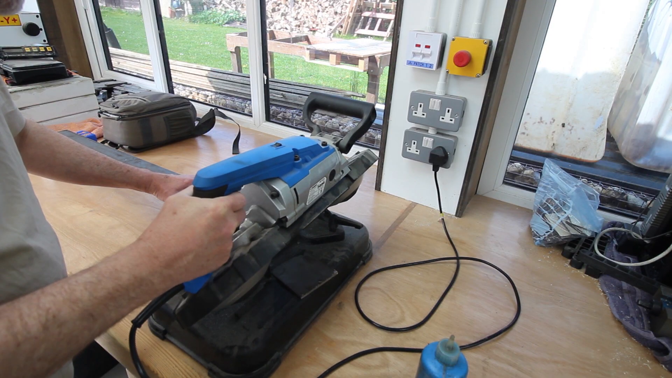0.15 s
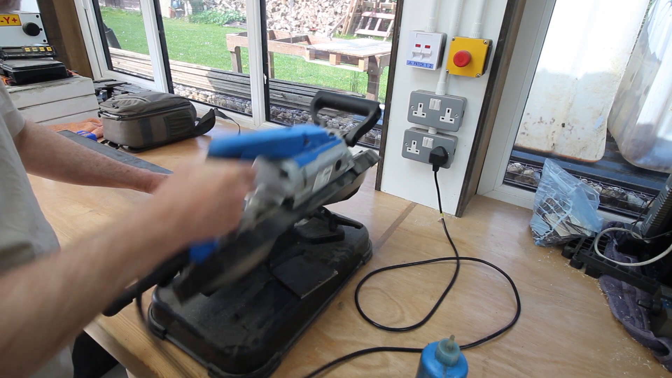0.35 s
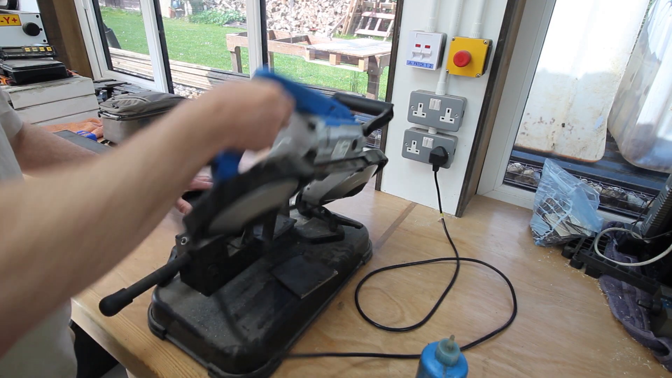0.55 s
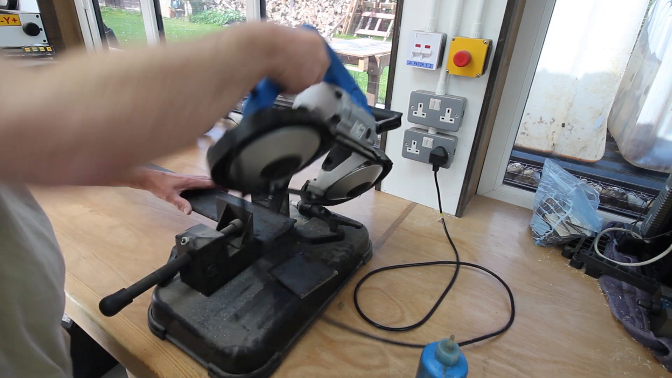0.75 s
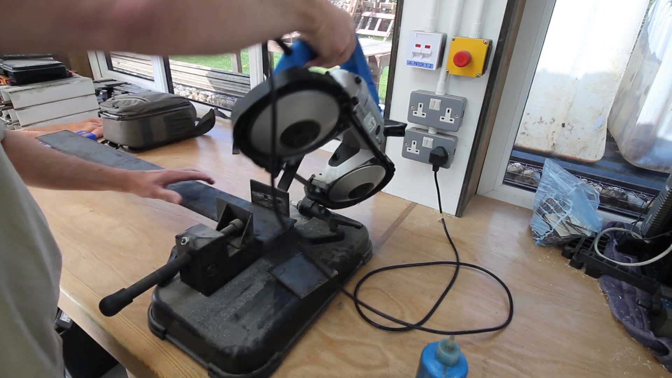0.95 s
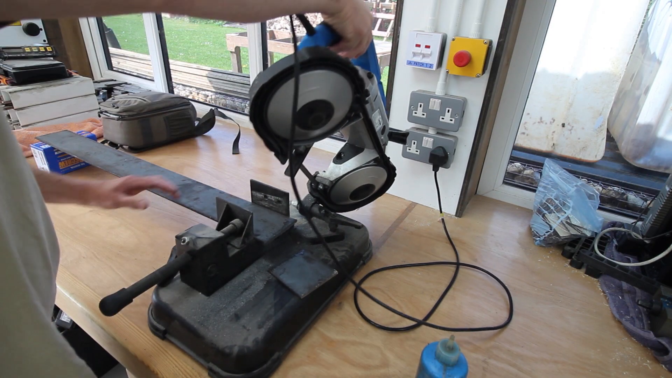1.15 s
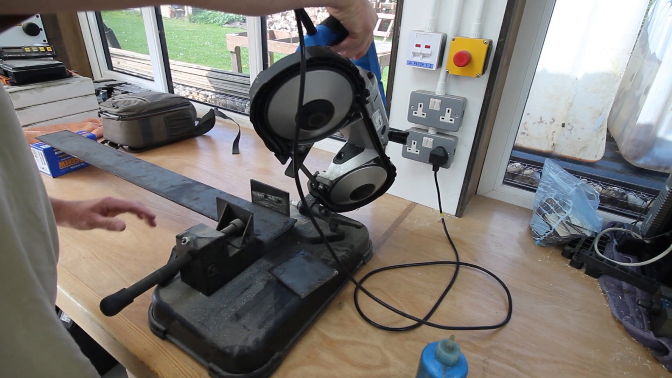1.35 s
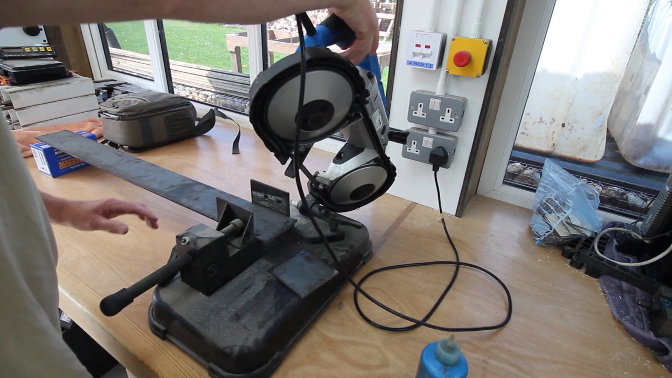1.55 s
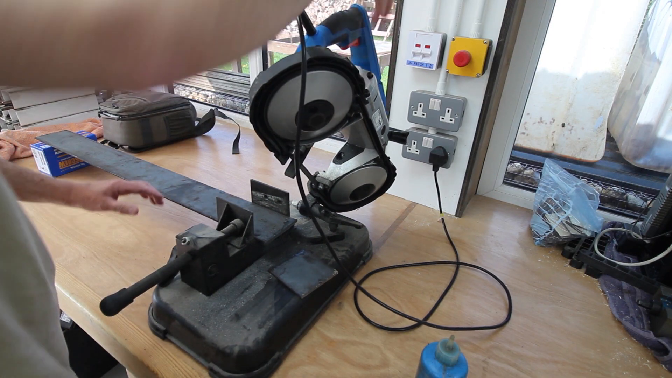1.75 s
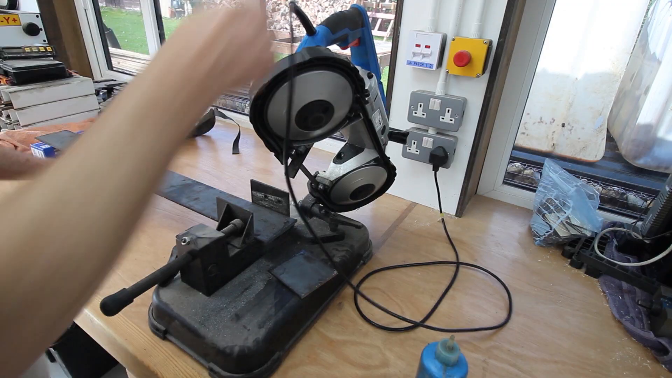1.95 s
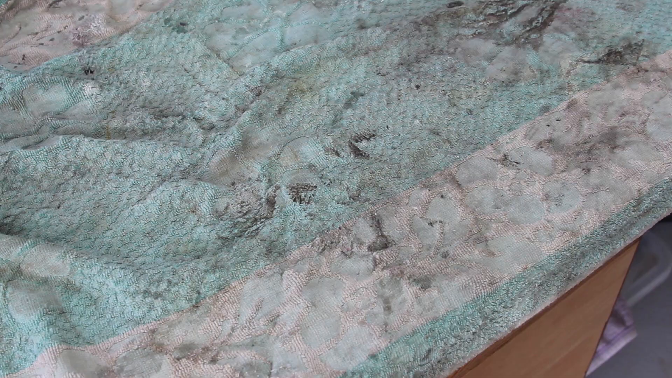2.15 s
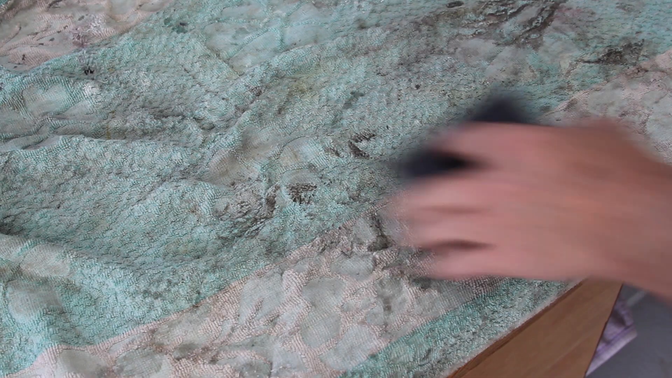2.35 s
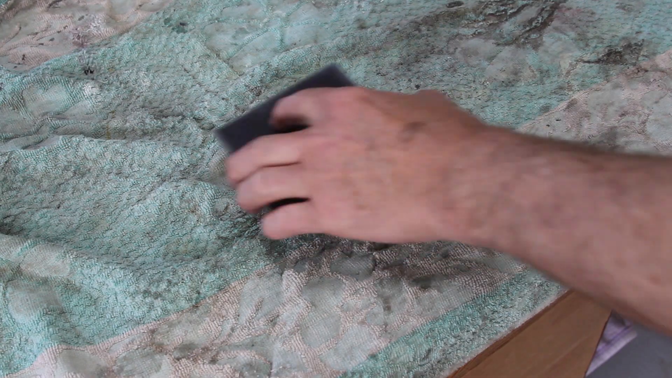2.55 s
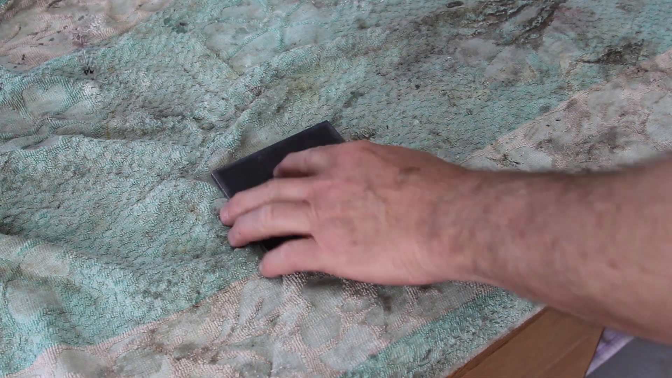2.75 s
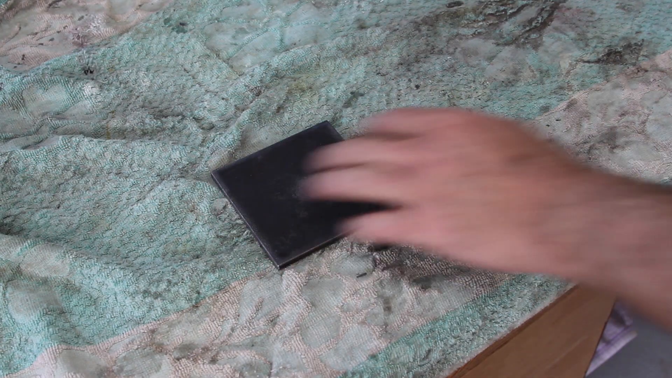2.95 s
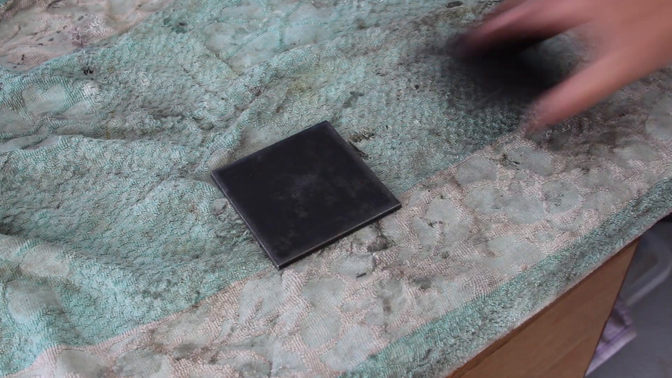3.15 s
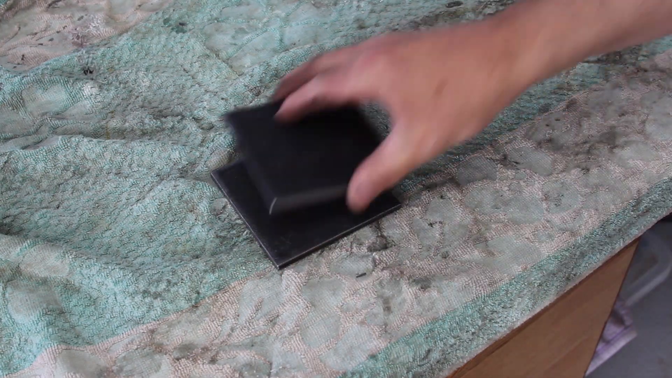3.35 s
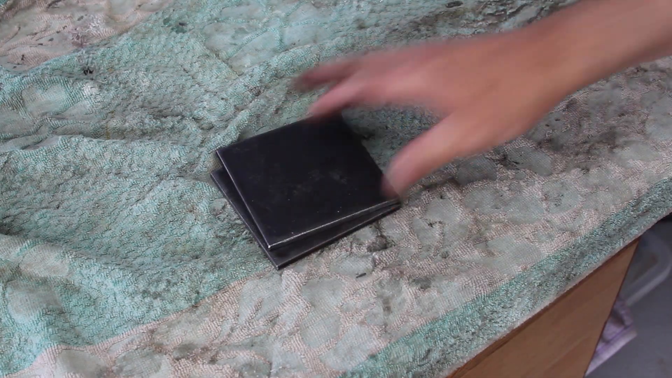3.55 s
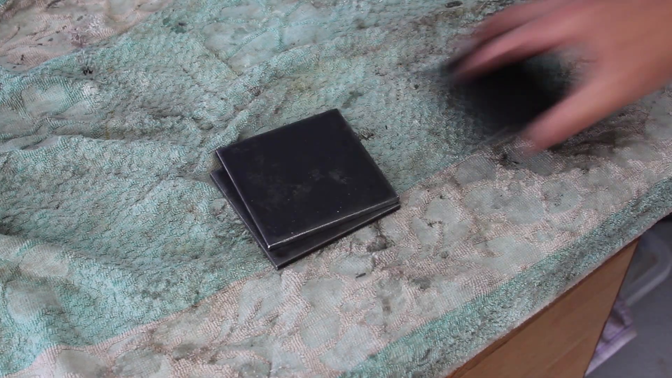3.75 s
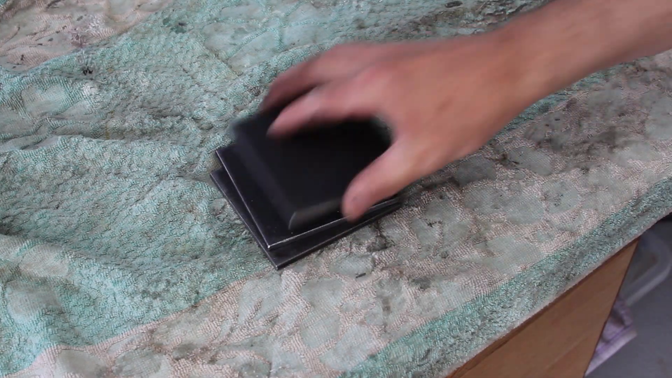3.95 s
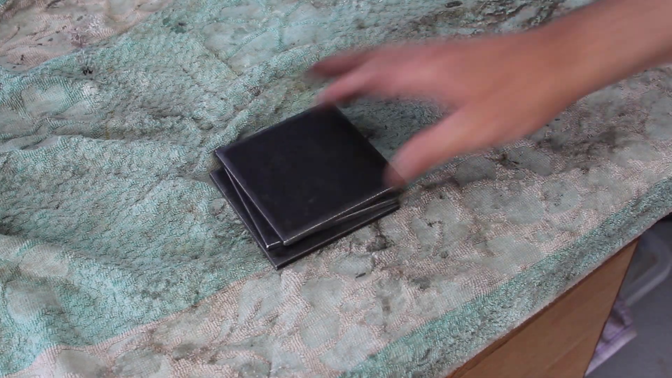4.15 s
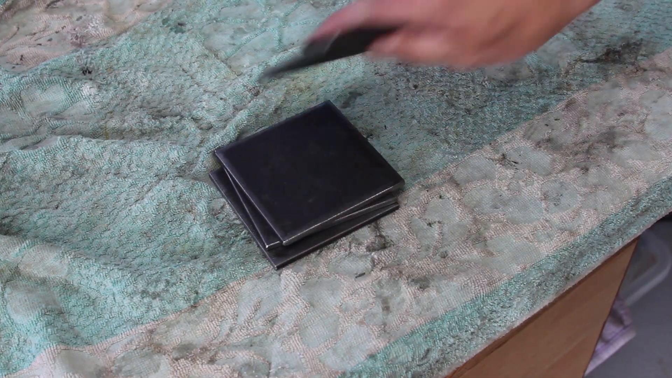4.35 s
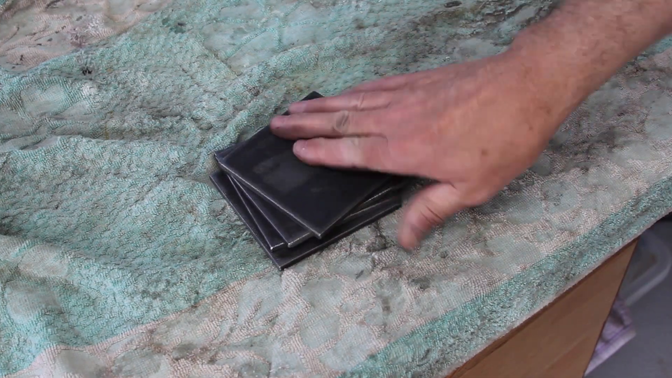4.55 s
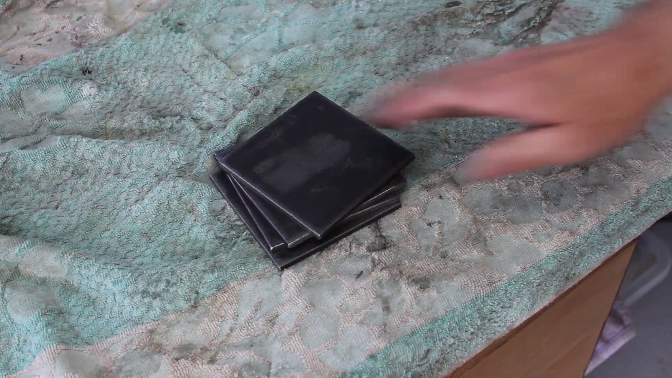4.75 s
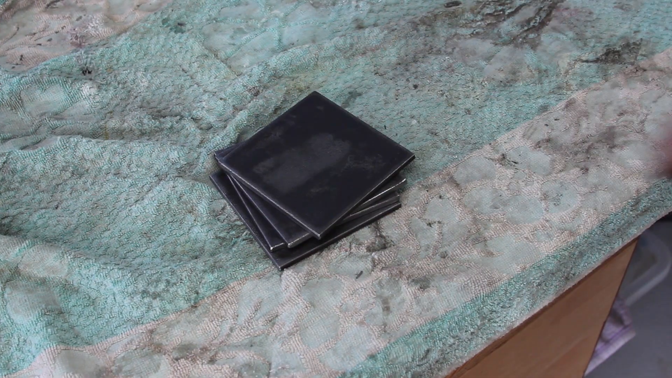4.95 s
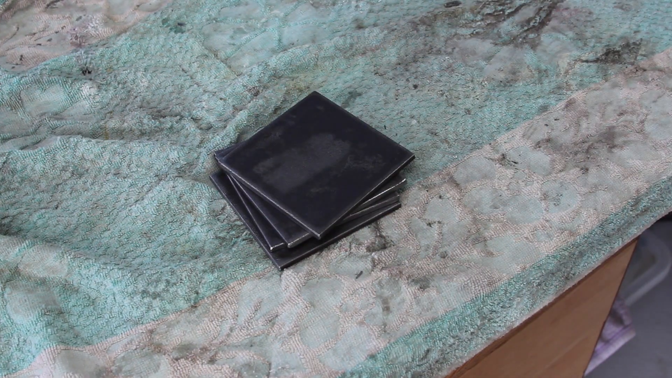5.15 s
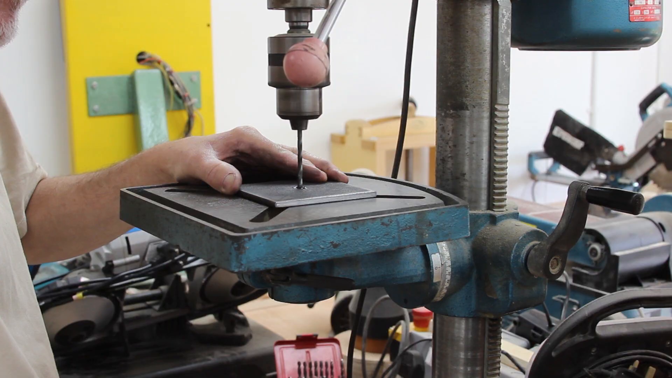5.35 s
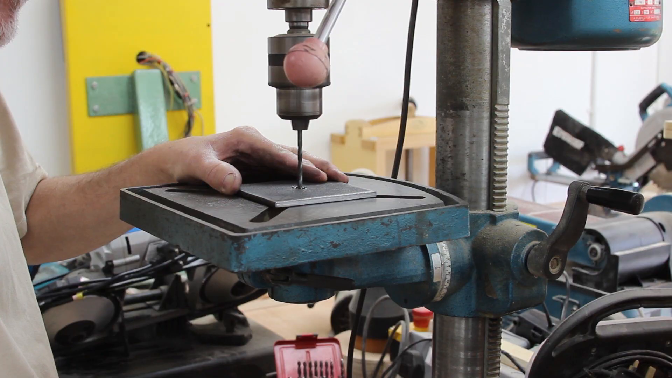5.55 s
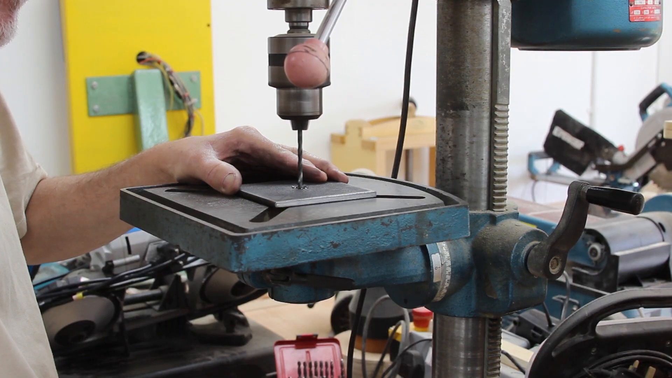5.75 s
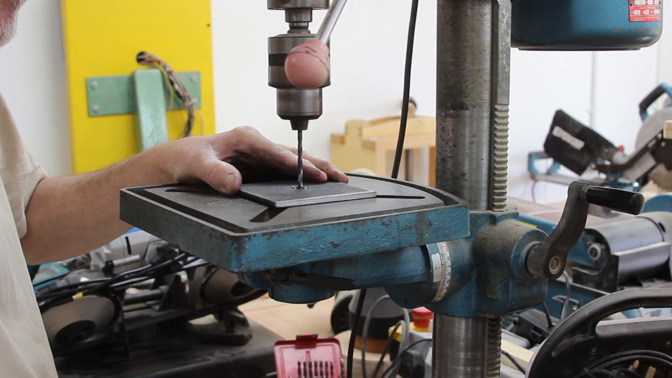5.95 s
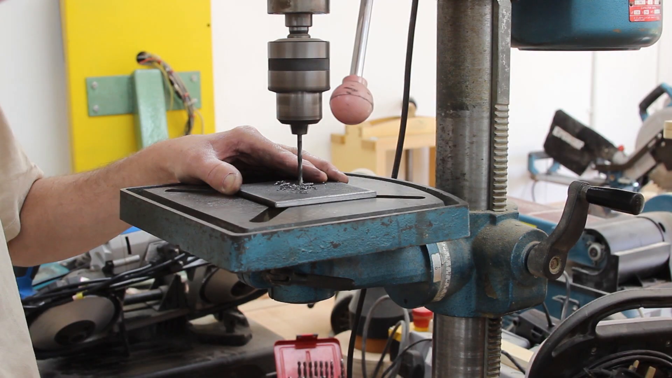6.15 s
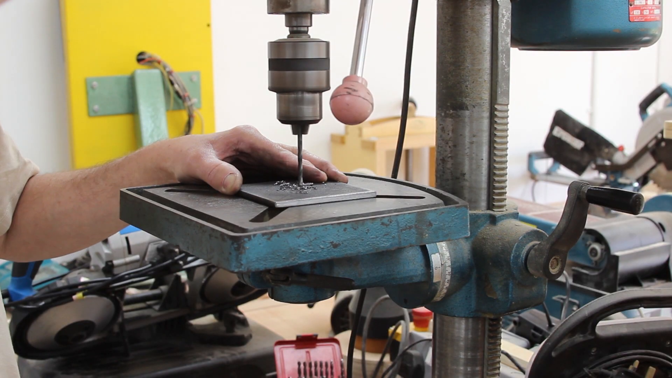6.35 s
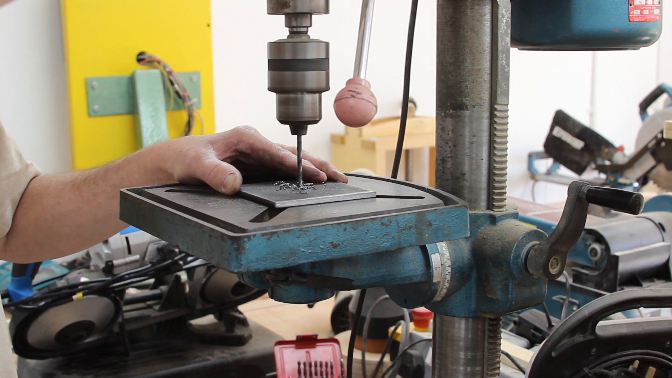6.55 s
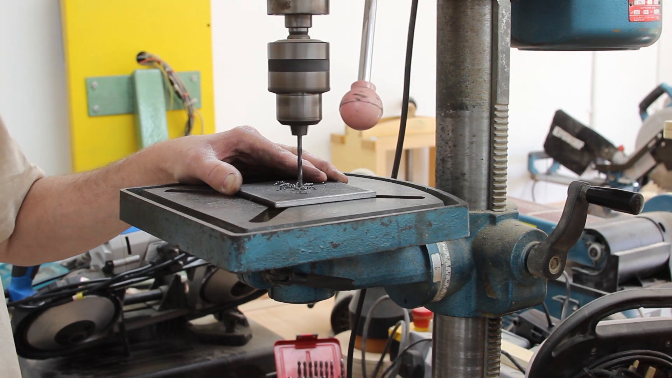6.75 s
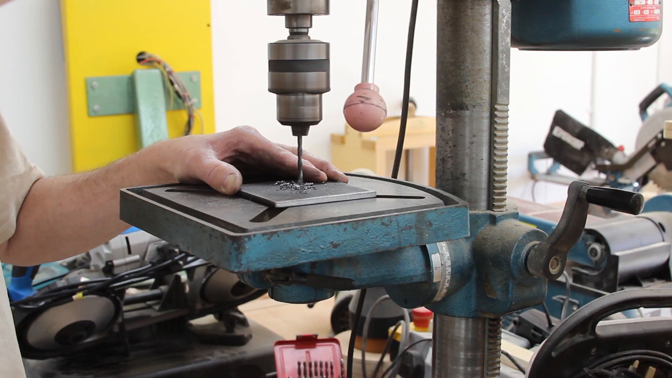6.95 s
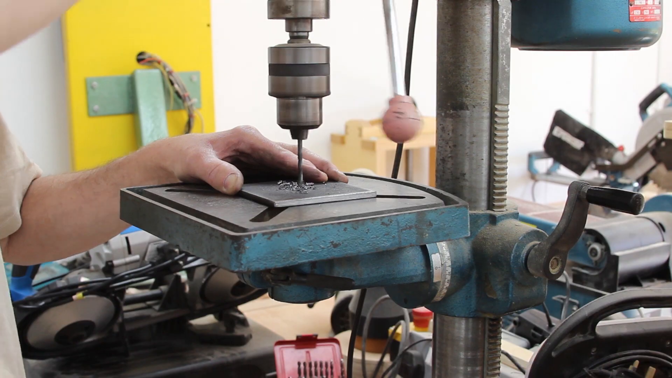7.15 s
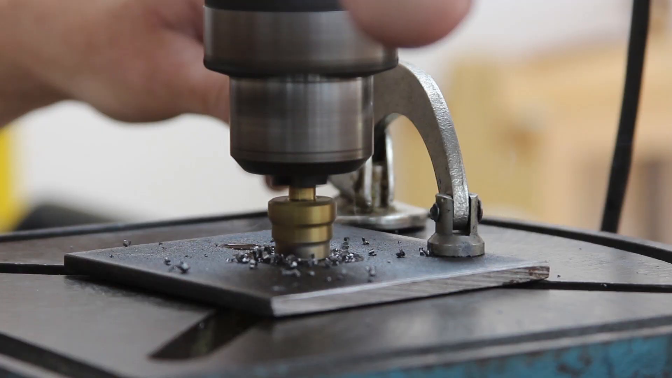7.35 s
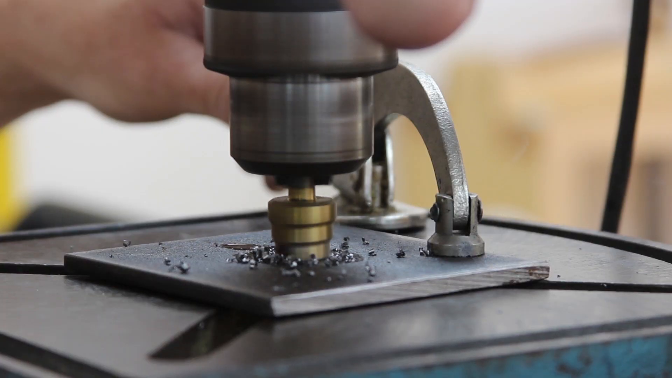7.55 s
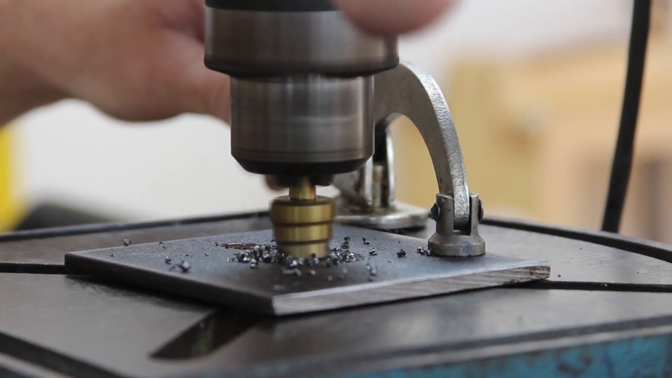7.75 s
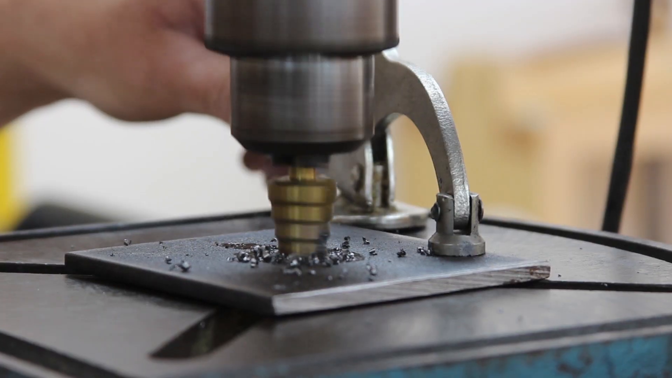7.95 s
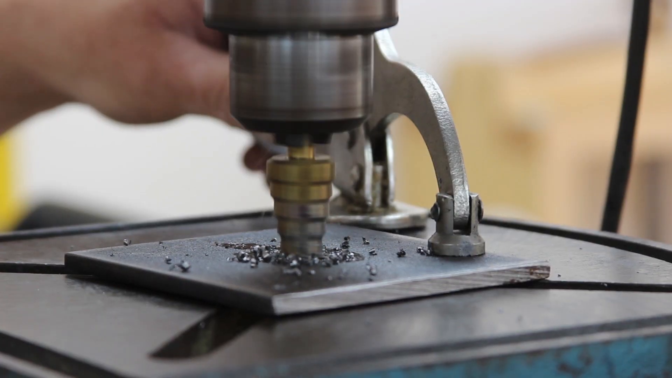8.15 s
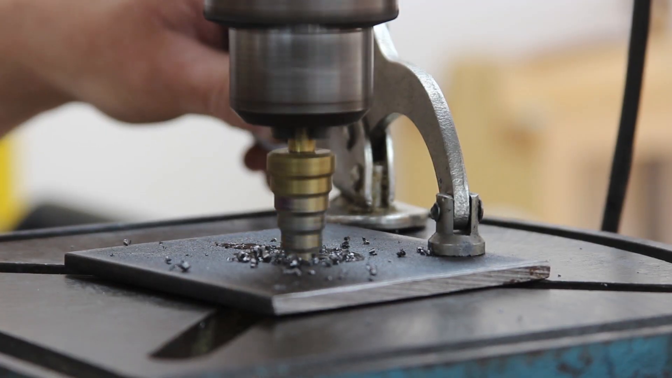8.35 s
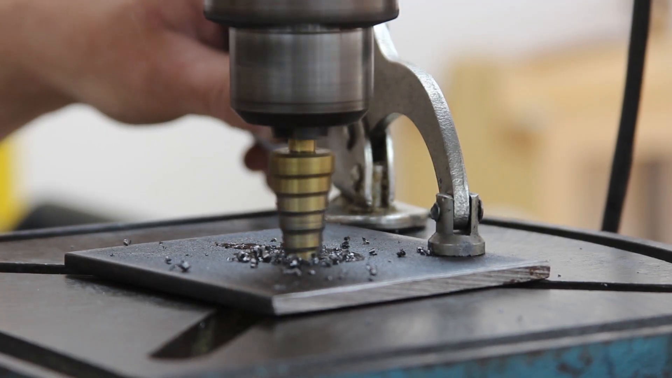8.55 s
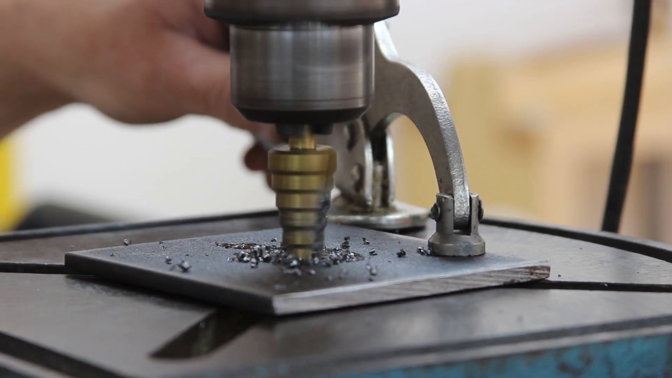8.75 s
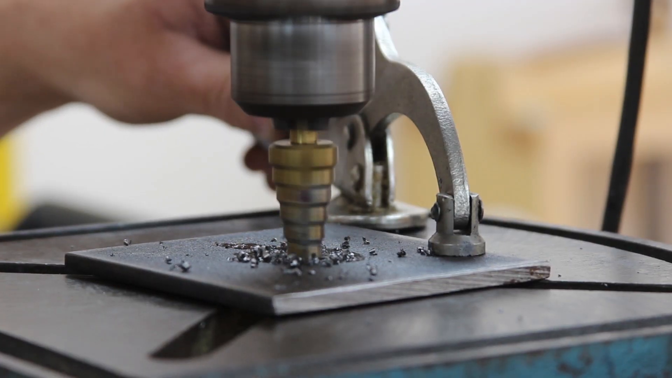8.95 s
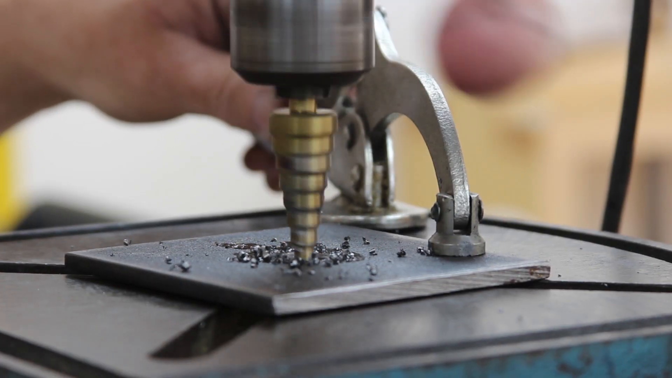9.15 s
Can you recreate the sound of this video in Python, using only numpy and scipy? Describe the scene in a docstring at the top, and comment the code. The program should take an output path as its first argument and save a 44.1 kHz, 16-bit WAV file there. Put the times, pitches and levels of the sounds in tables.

```python
"""A portable band saw is switched off and coasts down: shaft tones and noise excite the resonances of its housing.
Four steel plates are then stacked on a cloth-covered bench: each blow sums decaying modes, a crack and a thud.
A drill press bores a plate: hum, rumble and cutting noise, the middle passage played four times too fast.
A quiet room with a faint whine lies under the plates. A gain control ducks loud blows and the fast drilling."""
import sys
import numpy as np
from scipy import signal
from scipy.fft import rfft, irfft, next_fast_len
from scipy.io import wavfile
from scipy.ndimage import uniform_filter1d, minimum_filter1d, map_coordinates

SR = 44100
rng = np.random.default_rng(int(sys.argv[2]) if len(sys.argv) > 2 else 0)


def inscribe(sig):
    """Save sig as 16-bit PCM at rate SR to the path in sys.argv[1].

    A 1-D sig is mono; a 2-D sig holds one channel per row.
    Samples are clipped to [-1, 1] before scaling.
    """
    pcm = np.round(np.clip(np.atleast_2d(sig).T, -1, 1) * 32767)
    wavfile.write(sys.argv[1], SR, pcm.astype(np.int16))


N = 409248
T = np.arange(N) / SR  # time of each sample (s)
TOP_HZ = 16200  # upper band limit

# Passages
SAW_END_S, DRILL_START_S, FAST_START_S, FAST_END_S = 2.195, 5.272, 6.12, 7.393
# Edges of the plate passages: time_s
PLATE_EDGES = [2.195, 3.07, 3.634, 4.274, 5.271]

# Saw run-down
FULL_TURNS_PER_S, SWITCH_OFF_S = 353, 0.1055
FRICTION_TURNS_PER_S2 = 78.1
FAN_EVEN_TURNS_PER_S = 278.6  # at this speed fan drag equals friction
SKIP_AT_S, SKIPPED_S = 1.0, 0.3095  # the run-down jumps ahead
FADE_IN_S, FADE_IN_DB = 0.15, -3
# Shaft multiples of wheel and rotor imbalance: order
ROTOR_ORDERS = [.37, 1, 2]
# Shaft multiples of the gear mesh: order
GEAR_ORDERS = [11.65, 23.3, 34.9, 46.6, 58.2]
# Shaft multiples of pinion teeth, slots and commutator bars: order
ARMATURE_ORDERS = [7, 14, 21, 28]
# Shaft multiples of the commutator bar overtones: order
BAR_OVERTONES = [42, 56]
# Strength of each tone within its family, before the housing: relative_db
ROTOR_DB = [-4, 0.5, -10]
GEAR_DB = [1.5, -5, -6.5, -6, -10]
ARMATURE_DB = [-2.5, -6.5, -15, 2.5]
OVERTONE_DB = [-2.5, -1]
# Speed law of each family or noise: full_speed_db, rise_db (per halving of speed)
ROTOR_LEVEL = (-41, -6.5)
GEAR_LEVEL = (-41.5, -2.4)
ARMATURE_LEVEL = (-41.5, 1.2)
OVERTONE_LEVEL = (-49, 4)
WHIRR_LEVEL = (-28.5, -.8)
GROWL_LEVEL = (-42.5, 2.4)
# Noise of brushes and fan, before the housing: frequency_hz, density_db (relative, per Hz)
WHIRR_SPECTRUM = [(710, -30), (1200, -0.5), (1530, -8.5), (1720, -2.5), (2580, -1.5), (3220, 0.5),
                  (3820, -2), (5660, 0.5), (7300, -3.5), (10200, -15.5), (15200, -20), (15400, -72.5)]
# Noise of gearbox and wheels, before the housing: frequency_hz, density_db (relative, per Hz)
GROWL_SPECTRUM = [(15, -58), (25, -52), (214, -3.5), (261, 2.5), (373, -5), (594, 1), (912, -2), (1190, -3),
                  (1530, -13), (1800, -43), (2340, -37.5), (3960, -120)]
# Housing resonances: centre_hz, width_hz, boost_db (for noise; tones get 1.2 times as many dB)
HOUSING = [(280, 68, 5), (668, 240, 8), (1208, 57, 4), (3260, 300, 3), (4050, 130, 3.5), (4580, 330, 5),
           (5150, 130, 3.5), (5696, 51, 9.5), (7220, 430, 3)]
# How well the frame radiates a tone: frequency_hz, gain_db
RADIATION = [(60, -34), (130, -12), (300, -5.5), (800, -5.5), (1800, -8), (3500, 2), (7000, -3),
             (10000, -2), (15000, -21)]
# Low rumble while the saw is raised: start_s, end_s, centre_hz, level_db
SHUDDER = (1.5, 1.7, 70, -67)

# Plate contacts: time_s, ring_db, crack_db, thud_db, damping (1 = free, more = pressed), treble_corner_hz
CONTACTS = [(2.7436, -33, -38, -6, 1.9, 3570), (2.758, -36, -42, -6, 1.4, 3440),
            (3.482, -2.5, -5.5, -25.5, 2.3, 16000), (3.488, -11.5, -9, -25, 0.97, 16000),
            (4.0661, -3.5, 1, -33, 2.8, 16000), (4.413, -66, -58.5, -90, 3, 9000),
            (4.526, -17, -6, -24, 0.51, 16000), (4.543, -15, -14, -40.5, 1.9, 12000),
            (4.5589, -22, -4, -39, 2.8, 16000), (4.561, -0.5, -1.5, -27.5, 2.35, 12960),
            (4.629, -36.5, -34, -53.5, 2, 6000), (5.234, -68, -51, -80.5, 3, 5020)]
# Modes of a plate: mode_hz
PLATE_HZ = [1800, 1970, 2310, 2640, 2950, 3265, 3450, 4585, 4760, 5290, 6200, 8060, 8240, 8970, 10030,
            13420, 14980]
# The same modes: relative_db, t60_s (at damping 1)
PLATE_MODES = [(-8, 0.1), (-14, 0.16), (-15, 0.12), (-13.5, 0.095), (-5, 0.048), (3.5, 0.12), (-13, .07),
               (-3, 0.15), (-15, 0.038), (-19, 0.062), (-17.5, .07), (-7, 0.13), (-8.5, 0.1), (-12.5, 0.15),
               (-12.5, 0.077), (-6.5, 0.12), (-14, .05)]
# Crack of steel on steel: frequency_hz, density_db (relative, per Hz)
CRACK_SPECTRUM = [(200, -25), (1000, -7), (2000, 2.5), (5000, 8.5), (9000, -10), (16000, -14.5)]
# Resonances of the bench: centre_hz
BENCH_HZ = [150, 200, 275, 420, 640, 1080, 2000]
# The same resonances: width_hz, relative_db
BENCH_MODES = [(40, -2.5), (50, -0.5), (60, 2), (160, -2.5), (240, -0.5), (500, -9), (700, -21)]

# Drill levels: light boring, the fast passage, a hard bite that eases off, then one late rasp;
# the fast passage is then ducked by a gain control:
# time_s, motor_db, cutting_db, hum_db, lowest_tone_db (over the hum)
DRILL = [(5.27, -43, -49.5, -39.5, -7), (6.11, -42, -49.5, -40, -6), (6.125, -41.5, -53, -42, -2.5),
         (6.9, -41.5, -48.5, -41, -4.5), (7.385, -40.5, -49, -42.5, -1.5),
         (7.396, -37.5, -37.5, -36.5, -3.5), (7.82, -40.5, -40.5, -42.5, 0), (7.97, -44.5, -45.5, -41, 0),
         (8.07, -44, -56, -44, 2.5), (8.6, -43, -53, -44.5, 6), (9.07, -41, -53.5, -43, 4.5),
         (9.12, -43.5, -44, -48, 11), (9.28, -41, -49.5, -44.5, 6)]
# Hum of an induction motor on 50 Hz mains, at natural speed: pitch_hz
HUM_HZ = [100, 200, 300, 495, 665]
# The same hum tones: relative_db
HUM_DB = [-10.5, -19.5, 0.5, -12, -20]
# The pulley throbs once a turn, at natural speed
MOTOR_TURNS_PER_S, THROB_DB = 24.4, 0.5
# Motor and belt noise, before the castings: frequency_hz, density_db (relative, per Hz)
RUMBLE_SPECTRUM = [(20, -67), (45, -12), (100, -12), (250, -6.5), (400, -11), (1000, -5), (1500, -7),
                   (2100, -17.5), (3200, -15.5), (5000, -42), (8000, -36.5), (13600, -39.5), (13900, -90)]
# Drill head and table resonances: centre_hz, width_hz, boost_db
CASTING = [(328, 114, 17.5), (503, 26, 10.5), (663, 12, 10.5), (788, 9.3, 9.5), (1063, 110, 10),
           (1454, 4.6, 13), (1800, 16, 11), (2480, 22, 11.5), (2740, 67, 14), (3300, 100, 1), (4220, 45, 8)]
# Noise of the cutting edge, before the plate: frequency_hz, density_db (relative, per Hz)
CUTTING_SPECTRUM = [(150, -19), (300, 1), (700, -5), (1700, -2.5), (2600, -4), (4000, -7), (6000, -12.5),
                    (9000, -25.5), (13800, -39), (14400, -80)]
# Resonances of the clamped plate: centre_hz, width_hz, boost_db
WORKPIECE = [(329, 140, 15.5), (547, 32, 16.5), (1680, 280, 5.5), (2450, 360, 5), (4050, 350, 5),
             (5620, 400, 1.5)]
# An edge of the bit catches as the spindle turns: start_s, catch_s (time of one), catches_per_s, swell_db
CATCHES = [(5.272, 5.425, 11.3, 3), (6.12, 6.13, 22.6, 1), (7.393, 7.41, 5.2, 5), (8.05, 8.466, 5.75, 3)]
CATCH_SHARPNESS = 1.7
# Squeaks of the bit: start_s, end_s, pitch_hz, level_db
SQUEAKS = [(7.79, 7.96, 1720, -49), (5.28, 6.11, 4170, -65), (5.58, 5.8, 7700, -71), (5.6, 5.74, 7050, -72)]
# Swarf snaps off or lands; the fast passage is then ducked by a gain control: time_s, peak_db, centre_hz
CHIPS = [(6.132, -42, 6000), (7.057, -26, 4600), (7.0935, -21.5, 8500), (7.096, -21, 13100),
         (7.095, -22, 2980), (7.15, -36, 5000), (7.184, -29, 4280), (7.84, -53, 11500), (8.34, -56, 11000),
         (8.42, -54, 11000), (8.465, -43.5, 11000), (8.64, -53, 6000), (8.984, -32, 1060),
         (9.157, -54, 6000), (9.216, -42.5, 8100)]

# Reverberation of the workshop: frequency_hz, t60_s
ROOM = [(150, 0.76), (530, 0.46), (1400, .45), (3700, 0.54), (9700, 0.33)]
# Room tone: frequency_hz, density_db (relative, per Hz)
QUIET_SPECTRUM = [(18, -28.5), (30, 0.5), (54, -21.5), (119, -7.5), (199, -13.5), (245, -8.0), (527, -13.0),
                  (584, -5.0), (647, -14.0), (1170, -12), (13600, -25), (14100, -71.5)]
QUIET_DB = -65.5
# Faint whine in the room: pitch_hz, level_db
WHINE = [(586.8, -74.5), (1174, -85)]


def saw():
    """Forced vibration: a shaft tone swells when its falling pitch crosses a housing resonance."""
    n = round(SAW_END_S * SR)
    speed = coasting()[:n]
    turns = np.cumsum(speed * (1 + 0.00096 * wobble(59.8, count=n))) / SR

    def level(full_speed_db, rise_db):
        return amp(full_speed_db + rise_db * np.log2(FULL_TURNS_PER_S / speed))

    families = [(ROTOR_LEVEL, ROTOR_ORDERS, ROTOR_DB), (GEAR_LEVEL, GEAR_ORDERS, GEAR_DB),
                (ARMATURE_LEVEL, ARMATURE_ORDERS, ARMATURE_DB), (OVERTONE_LEVEL, BAR_OVERTONES, OVERTONE_DB)]
    tones = np.zeros(n)
    for law, orders, strengths_db in families:
        family = sum(shaft_tone(turns, speed, order, db) for order, db in zip(orders, strengths_db))
        tones += level(*law) * family
    tones = filtered(tones, lambda hz: boosts(HOUSING, hz) ** 1.2 * amp(along(RADIATION, hz)))

    whirr = rush(WHIRR_SPECTRUM, HOUSING, lumps_db=1.0, rate=400, patchy_db=1.4)[:n]
    whirr *= level(*WHIRR_LEVEL) * amp(0.41 * wobble(10.8, count=n))
    growl = rush(GROWL_SPECTRUM, HOUSING, lumps_db=-1.0, rate=37, patchy_db=1.7)[:n]
    growl *= level(*GROWL_LEVEL) * amp(1.04 * wobble(15, count=n))
    fade_in = amp(FADE_IN_DB * np.clip(1 - T[:n] / FADE_IN_S, 0, 1))
    return np.pad((tones + whirr + growl) * fade_in, (0, N - n))


def coasting():
    """Braked rotation: steady friction plus fan drag that grows with the square of speed."""
    skipped_s = SKIPPED_S * (T >= SKIP_AT_S)
    free_s = np.clip(T - SWITCH_OFF_S + skipped_s, 0, SAW_END_S + SKIPPED_S)
    start_angle = np.arctan(FULL_TURNS_PER_S / FAN_EVEN_TURNS_PER_S)
    angle = start_angle - FRICTION_TURNS_PER_S2 / FAN_EVEN_TURNS_PER_S * free_s
    return FAN_EVEN_TURNS_PER_S * np.tan(angle)


def shaft_tone(turns, speed, order, db):
    """Order locking: pitch is a multiple of shaft speed; play in gears and brushes blurs higher orders."""
    n = len(turns)
    play = 0.19 * min(1, order / 10) * wobble(70, count=n)
    flicker_db = 4 * min(1, 0.5 + order / 12) * wobble(45, count=n)
    cycles = order * turns + play + rng.random()
    return amp(db + flicker_db) * np.sin(2 * np.pi * cycles) * (order * speed < TOP_HZ)


def shudder():
    """Band-limited noise: a lumpy low rumble around one frequency."""
    start_s, end_s, centre_hz, db = SHUDDER
    low = filtered(rng.standard_normal(N), lambda hz: 1 / (1 + ((hz - centre_hz) / 35) ** 4))
    return amp(db + 4 * wobble(24)) * unit(low) * (T > start_s) * (T < end_s)


def plates():
    """Impact excitation over room tone; the gain control starts fresh in each passage."""
    out = room_tone() * ((T >= PLATE_EDGES[0]) & (T < PLATE_EDGES[-1]))
    for time_s, *blow in CONTACTS:
        start = round(time_s * SR)
        end = round(min(edge for edge in PLATE_EDGES if edge > time_s) * SR)
        out[start:end] += contact(*blow)[:end - start]
    for start_s, end_s in zip(PLATE_EDGES, PLATE_EDGES[1:]):
        passage = slice(round(start_s * SR), round(end_s * SR))
        out[passage] = gain_control(out[passage])
    return out


def contact(ring_db, crack_db, thud_db, damping, corner_hz):
    """Modal superposition: plate modes decay, an edge cracks, the bench thuds and the room answers."""
    t = T[:SR]
    ring = np.zeros(SR)
    for hz, (db, t60) in zip(PLATE_HZ, PLATE_MODES):
        spot_db = rng.normal(0, 1.5)  # each blow lands on another spot
        decay = amp(db + spot_db - 60 * t * damping / t60)
        ring += decay * np.sin(2 * np.pi * hz * t + 0.9 * wobble(60, count=SR))

    crack = unit(filtered(rng.standard_normal(SR), lambda hz: amp(along(CRACK_SPECTRUM, hz))))
    crack *= amp(-60 * t / 0.033)
    push = amp(-60 * t / 0.035) * rng.standard_normal(SR)
    thud = filtered(push, bench_response)
    blow = amp(ring_db) * ring + amp(crack_db) * crack + amp(thud_db) * thud / np.abs(thud).max()

    # A softer contact has a lower treble corner; the microphone picks up little deep bass
    blow = signal.sosfilt(signal.butter(4, min(corner_hz, SR / 2.2), fs=SR, output="sos"), blow)
    blow = signal.sosfilt(signal.butter(2, 110, "high", fs=SR, output="sos"), blow)
    return blow + amp(-9) * room(blow)


def bench_response(hz):
    """Damped oscillators in parallel, with alternating sign from one resonance to the next."""
    response = 0
    for k, (centre, (width, db)) in enumerate(zip(BENCH_HZ, BENCH_MODES)):
        damping = 1j * hz * width
        response = response + (-1) ** k * amp(db) * damping / (centre * centre - hz * hz + damping)
    return response


def drill():
    """Source and resonator: hum, motor noise through the castings, cutting noise through the plate."""
    motor_db, cutting_db, hum_db, lowest_db = curves(DRILL)
    throb = amp(THROB_DB * np.sin(2 * np.pi * MOTOR_TURNS_PER_S * T))
    lowest, *upper = [amp(db + 0.99 * wobble(3.08)) * np.sin(2 * np.pi * hz * T)
                      for hz, db in zip(HUM_HZ, HUM_DB)]
    hum = amp(lowest_db) * replayed(lowest) + replayed(throb * sum(upper))
    motor = throb * amp(1.1 * wobble(14)) * rush(RUMBLE_SPECTRUM, CASTING, lumps_db=0.5, rate=30, patchy_db=0.73)
    cutting = rush(CUTTING_SPECTRUM, WORKPIECE, lumps_db=1.0, rate=150, patchy_db=1.5)

    press = amp(hum_db) * hum + amp(motor_db) * replayed(motor)
    press += amp(cutting_db + catches_db()) * replayed(cutting)
    out = (press + squeaks() + chips()) * (T >= DRILL_START_S)
    fast = slice(round(FAST_START_S * SR), round(FAST_END_S * SR))
    out[fast] = gain_control(out[fast], ceiling_db=-19, hold_s=0.027, back_db_per_s=120, attack_s=0.0094)
    return out


def catches_db():
    """Periodic amplitude modulation: the cutting swells each time an edge comes round."""
    rows = np.array(CATCHES)
    _, catch_s, rate, swell_db = rows[np.searchsorted(rows[1:, 0], T)].T
    return swell_db * np.abs(np.cos(np.pi * rate * (T - catch_s))) ** (2 * CATCH_SHARPNESS)


def squeaks():
    """Pure tones at a fixed pitch with a randomly fluctuating amplitude: the bit squeaks."""
    out = np.zeros(N)
    for start_s, end_s, hz, db in SQUEAKS:
        out += amp(db + 4.6 * wobble(40)) * np.sin(2 * np.pi * hz * T) * (T > start_s) * (T < end_s)
    return out


def chips():
    """Transient noise: band-limited ticks with a fast rise and exponential decay, shorter when higher."""
    out, t = np.zeros(N + 2000), T[:2000]
    for time_s, db, hz in CHIPS:
        def band(f):
            return (f < 15000) * (f > hz / 4) / (1 + ((f - hz) / (0.21 * hz)) ** 2)

        noise = filtered(rng.standard_normal(len(t)), band)
        t60 = 0.029 * (6000 / hz) ** 0.4
        snap = amp(-60 * t / t60) * (1 - np.exp(-t / 0.00037)) * noise
        out[round(time_s * SR):][:len(t)] += amp(db) * snap / np.abs(snap).max()
    return out[:N]


def replayed(x):
    """Time compression: four times faster and higher in the middle drill passage, natural elsewhere."""
    start, end = round(FAST_START_S * SR), round(FAST_END_S * SR)
    fast = signal.resample_poly(x, 1, 4)[:end - start]
    fast = filtered(fast, lambda hz: (hz < 14600) / (1 + (170 / (hz + 1)) ** 2))
    return np.concatenate([x[:start], unit(fast) * x.std(), x[end:]])


def room(x):
    """Reverberation: a diffuse noise tail in which each frequency dies at its own rate."""
    hz, t, z = signal.stft(rng.standard_normal(SR), SR, nperseg=256)
    tail = signal.istft(z * amp(-60 * t / along(ROOM, hz)[:, None]), SR, nperseg=256)[1]
    delayed = np.pad(x, (250, 0))  # delay in samples
    return signal.fftconvolve(delayed, tail / np.linalg.norm(tail))[:len(x)]


def room_tone():
    """Stationary background: shaped noise plus faint whine tones that waver in level."""
    out = amp(QUIET_DB) * rush(QUIET_SPECTRUM, [], lumps_db=0.0, rate=9.7, patchy_db=0.0)
    for hz, db in WHINE:
        out += amp(db + 1.5 * wobble(7.4)) * np.sin(2 * np.pi * hz * T)
    return out


def gain_control(x, ceiling_db=-11, hold_s=0.26, back_db_per_s=35, attack_s=0.014):
    """Dynamic compression: gain ducks under peaks, holds, creeps back; what it misses is soft-clipped."""
    need_db = np.minimum(0, ceiling_db - 20 * np.log10(np.abs(x) + 1e-9))
    size = int(hold_s * SR) | 1
    held_db = minimum_filter1d(need_db, size=size, origin=size // 2, mode="nearest")
    climb_db = back_db_per_s * T[:len(x)]
    gain_db = np.minimum(0, climb_db + np.minimum.accumulate(held_db - climb_db))
    keep = np.exp(-1 / (attack_s * SR))
    y = x * amp(signal.lfilter([1 - keep], [1, -keep], gain_db))
    return y / (1 + np.abs(y / 0.27) ** 3) ** (1 / 3)


def rush(spectrum, body, lumps_db, rate, patchy_db):
    """Filtered noise: rms 1, uneven in time and frequency, through a spectrum and a body."""
    lumpy = amp(lumps_db * wobble(rate)) * rng.standard_normal(N)
    z = signal.stft(lumpy, nperseg=512)[2]
    field = uniform_filter1d(rng.standard_normal(z.shape), size=5, axis=0)
    field = uniform_filter1d(field, size=10, axis=1)
    patchy = signal.istft(z * amp(patchy_db * unit(field)), nperseg=512)[1][:N]
    return unit(filtered(patchy, lambda hz: amp(along(spectrum, hz)) * boosts(body, hz)))


def boosts(peaks, hz):
    """Resonance: gain of a body whose modes lift what passes through."""
    return amp(sum(db / (1 + (2 * (hz - centre) / width) ** 2) for centre, width, db in peaks))


def filtered(x, response):
    """Linear filtering: the spectrum of x times a response of frequency."""
    m = next_fast_len(len(x) + SR)
    return irfft(rfft(x, m) * response(np.fft.rfftfreq(m, 1 / SR)), m)[:len(x)]


def wobble(rate, count=N):
    """Random modulation: a smooth curve from random knots, rate knots a second."""
    knots = rng.standard_normal(int(count * rate / SR) + 4)
    return map_coordinates(knots, [T[:count] * rate])


def curves(rows):
    """Linear interpolation: one value per sample for each column after the time."""
    s, *columns = np.transpose(rows)
    return [np.interp(T, s, column) for column in columns]


def along(points, hz):
    """Logarithmic pitch scale: interpolates frequency and value points on a log axis."""
    f, v = np.transpose(points)
    return np.interp(np.log(hz + 1), np.log(f + 1), v)


def amp(db):
    """Decibel law: amplitude ratio of a level in dB."""
    return 10 ** (np.asarray(db) / 20)


def unit(x):
    """Power normalization: x scaled to rms 1."""
    return x / np.sqrt(np.mean(x ** 2) + 1e-20)


def scene():
    """Superposition: all sources add, and one microphone feeds both channels."""
    return np.tile(saw() + shudder() + plates() + drill(), (2, 1))


def record(dry):
    """Band limitation: a steep low-pass removes what lies above the upper limit."""
    return np.array([filtered(x, lambda hz: 1 / (1 + (hz / TOP_HZ) ** 120)) for x in dry])


dry = scene()
out = record(dry)
inscribe(out)
```